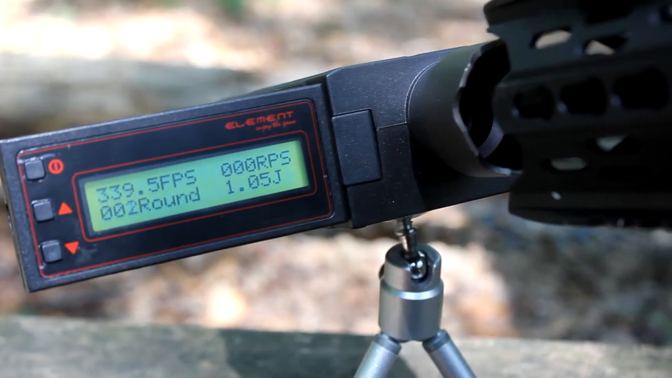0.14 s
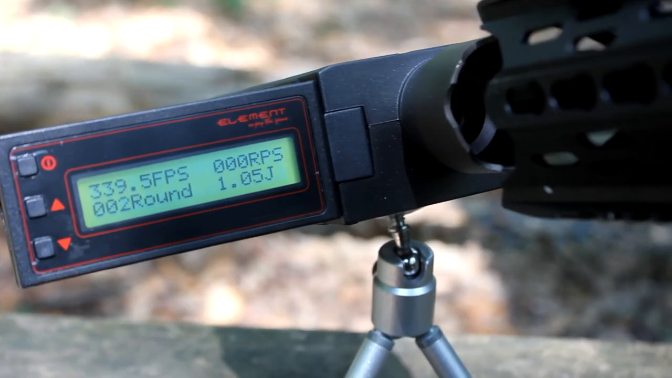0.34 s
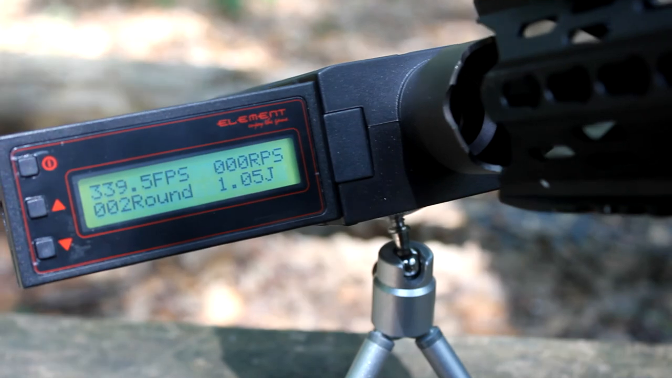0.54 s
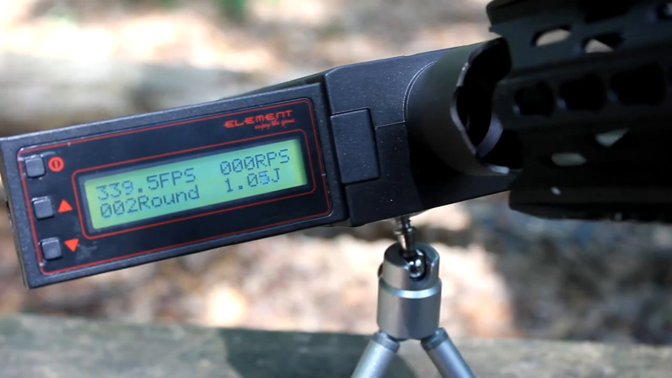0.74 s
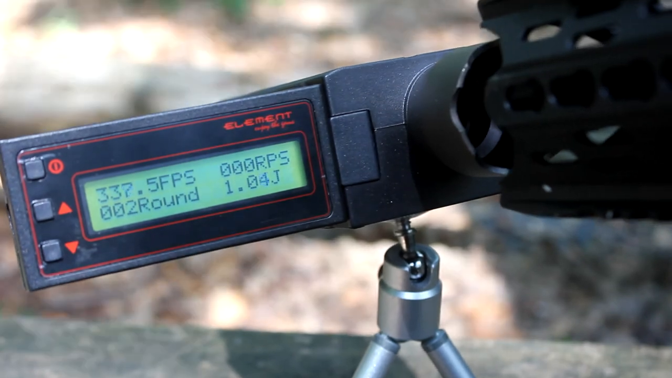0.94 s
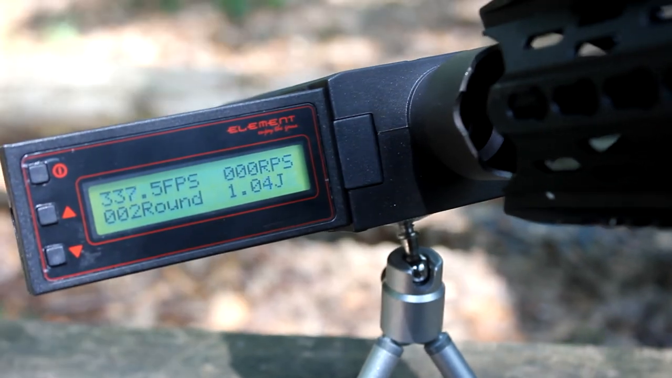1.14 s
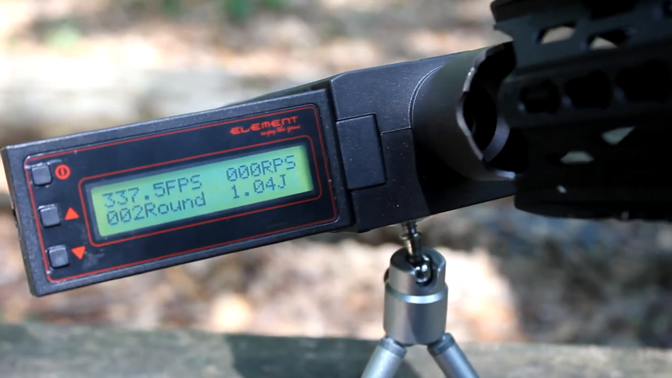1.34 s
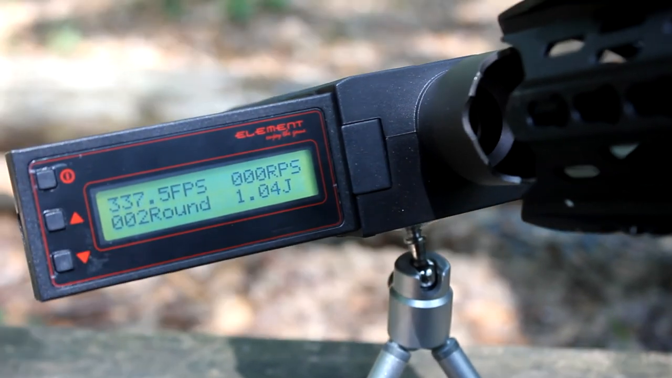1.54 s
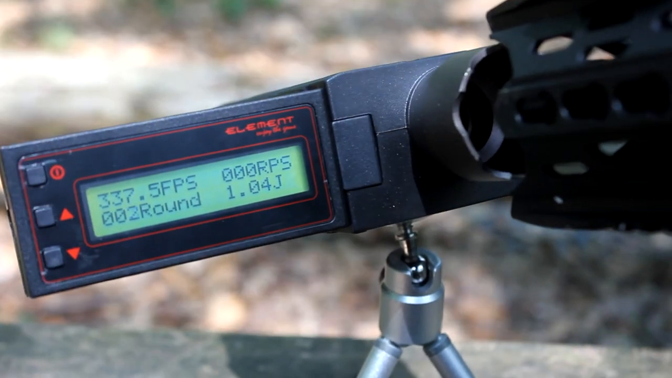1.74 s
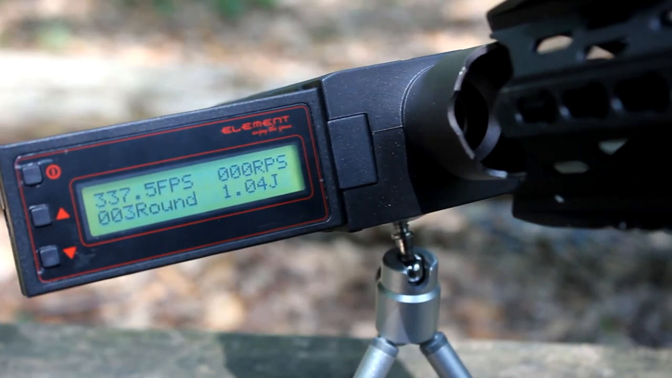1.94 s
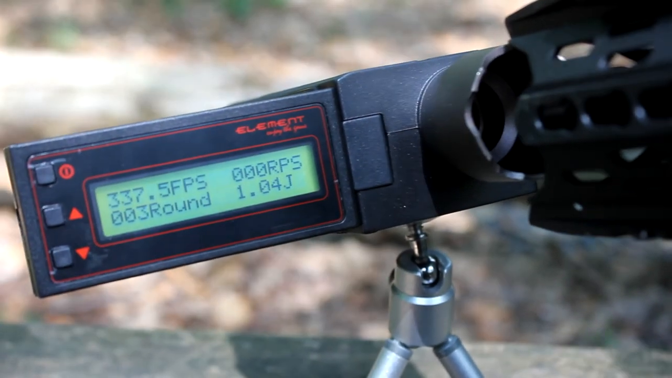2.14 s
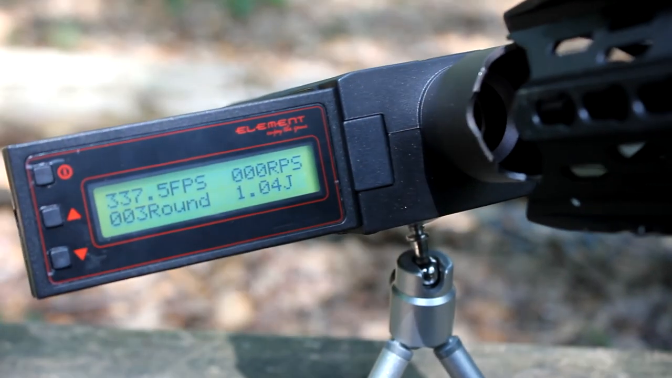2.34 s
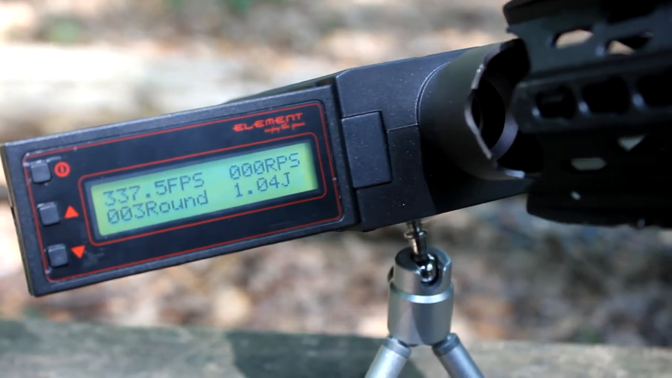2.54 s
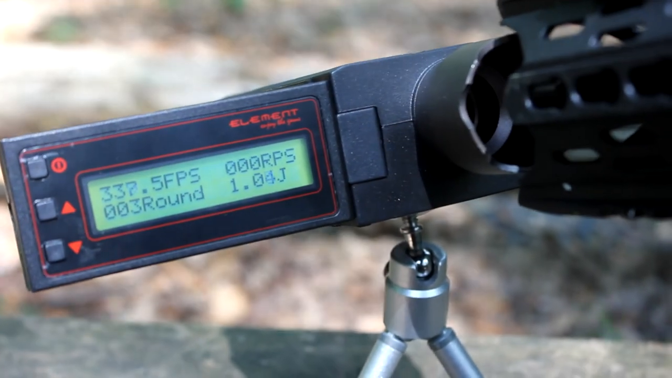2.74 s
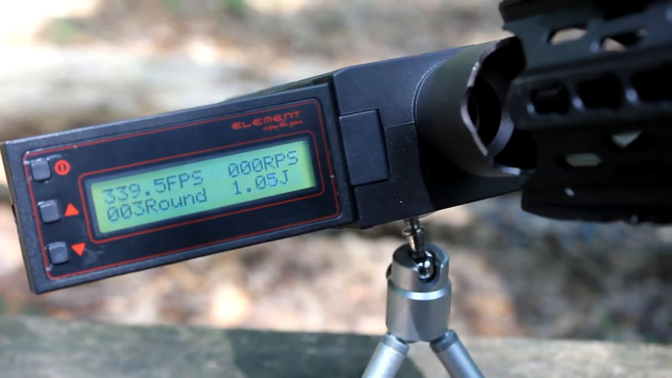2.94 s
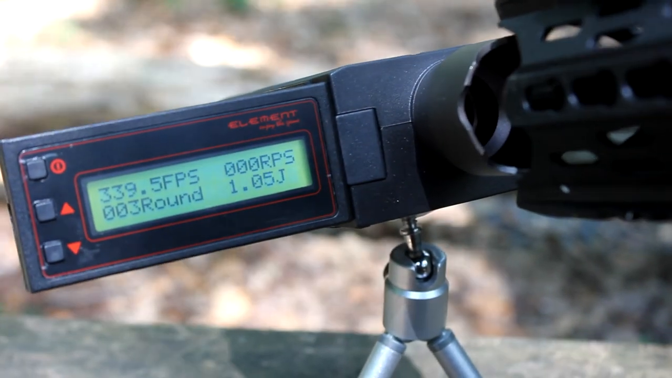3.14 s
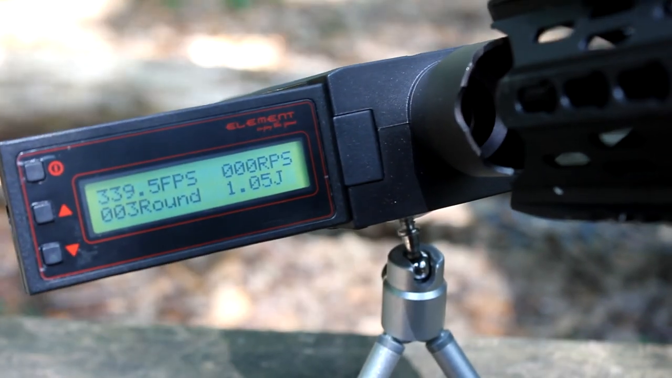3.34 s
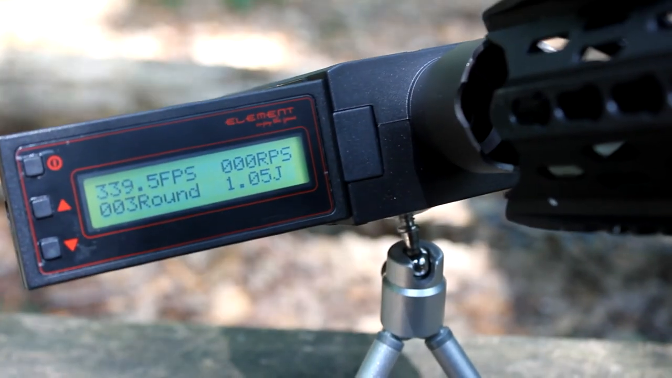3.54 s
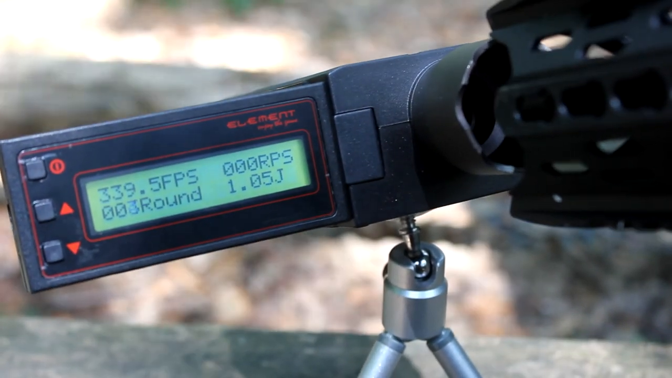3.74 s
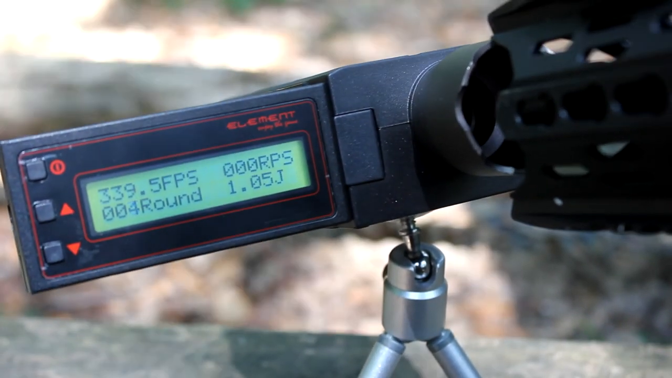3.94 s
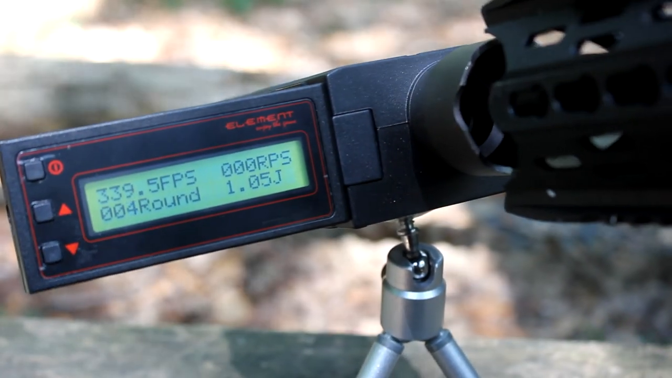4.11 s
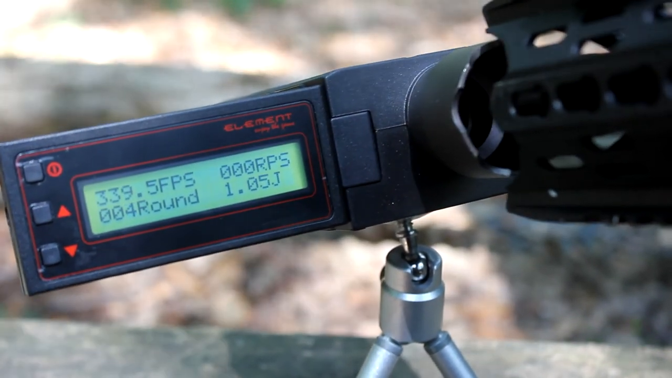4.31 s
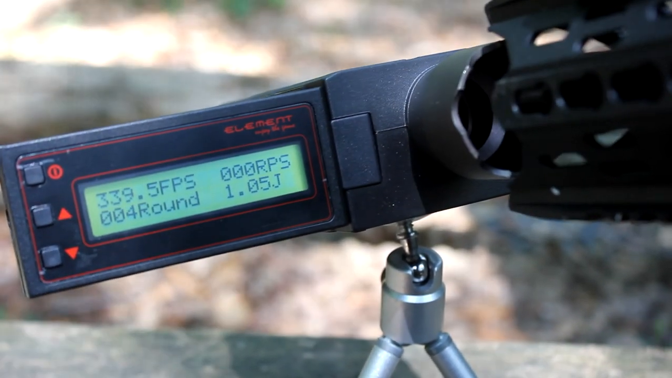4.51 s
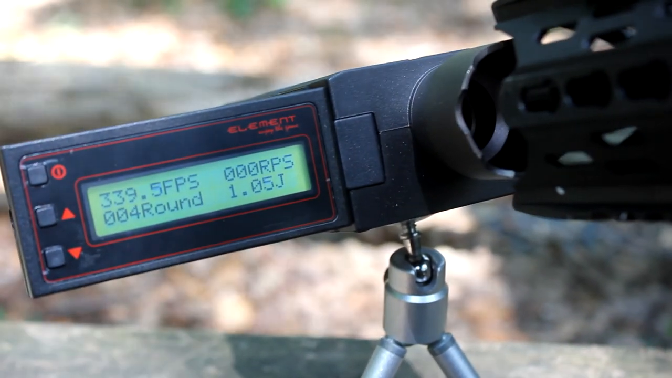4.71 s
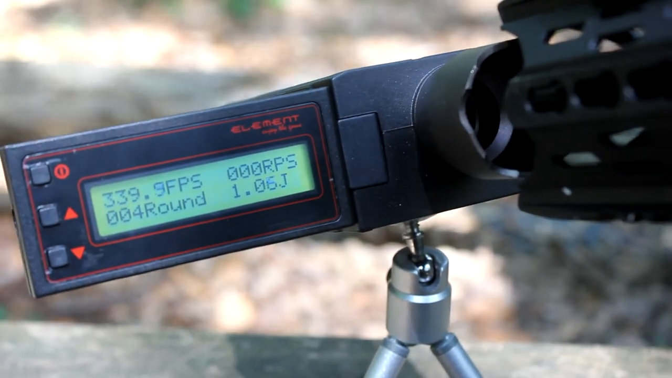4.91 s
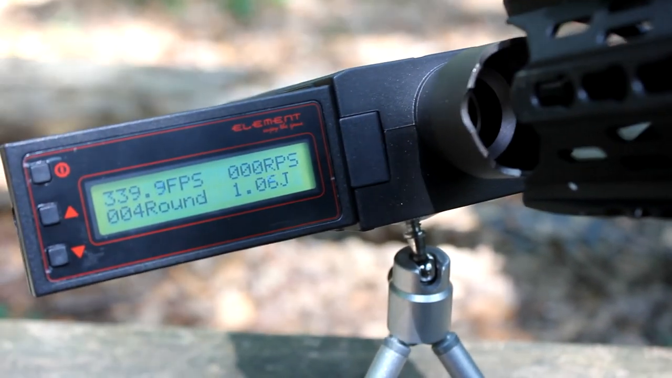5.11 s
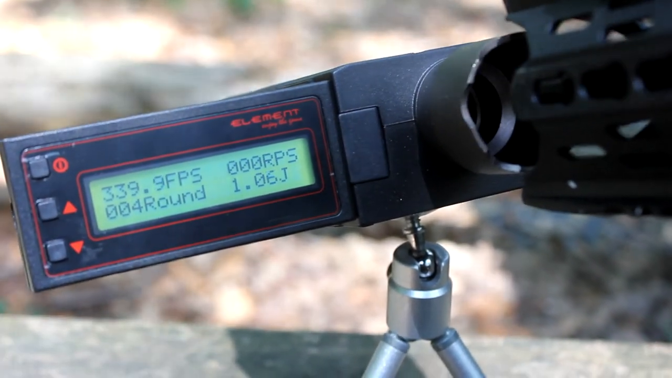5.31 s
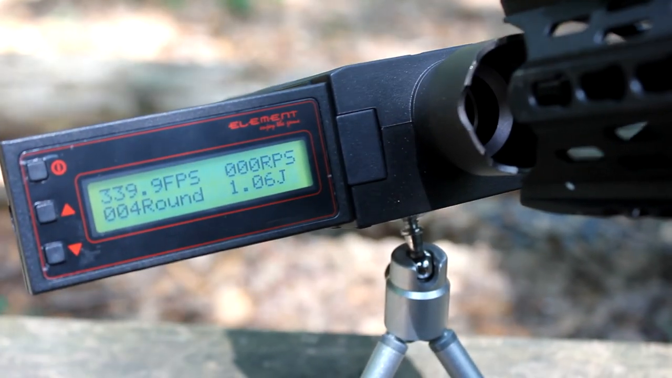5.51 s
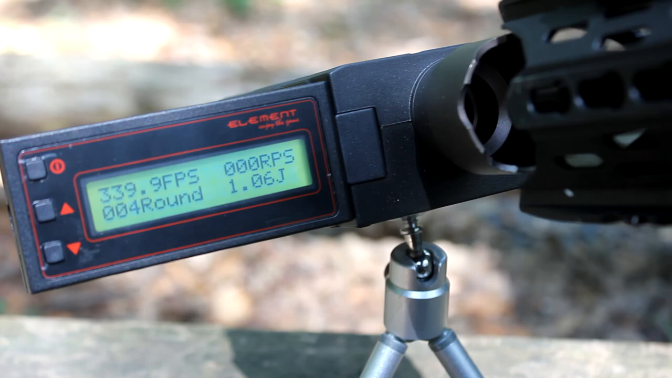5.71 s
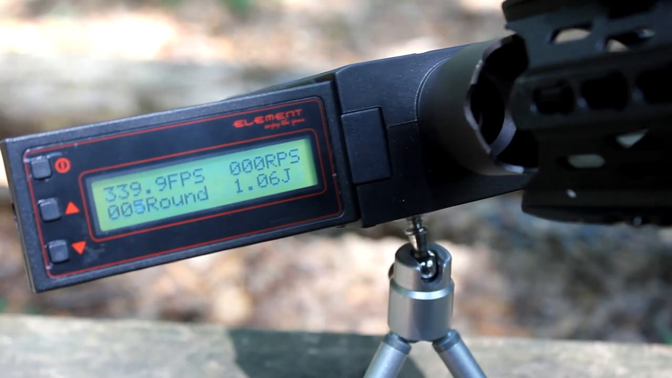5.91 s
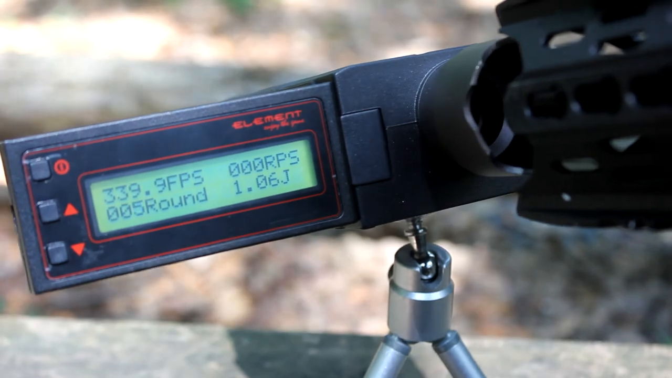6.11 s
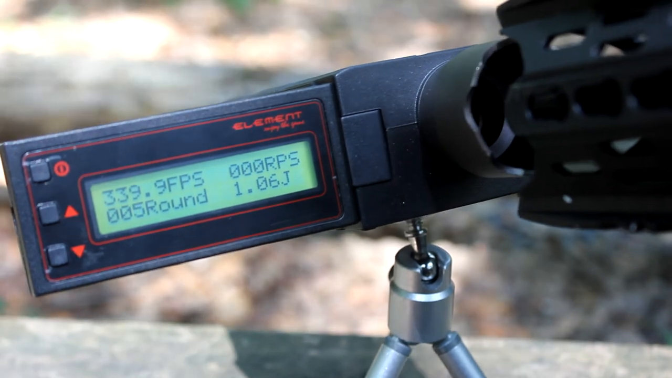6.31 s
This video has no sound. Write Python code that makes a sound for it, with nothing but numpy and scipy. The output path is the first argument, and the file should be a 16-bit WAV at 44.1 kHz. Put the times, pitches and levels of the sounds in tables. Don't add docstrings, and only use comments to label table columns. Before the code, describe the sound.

Close to a small camera microphone in a wood, an electric airsoft rifle fires four spaced single shots. Each begins with a very short rising motor and gear whine, then a sharp rattling piston clack, a tiny pellet tick and a faint gear run-down. Soft leaf hiss dips at each shot and swells back. A bird whistles early, wind thumps the microphone midway, and another bird trills before the last shot.

```python
import sys
import numpy as np
from scipy import signal
from scipy.fft import rfft, irfft
from scipy.io import wavfile
from scipy.ndimage import uniform_filter1d

SR = 44100
rng = np.random.default_rng(int(sys.argv[2]) if len(sys.argv) > 2 else 0)


def convert_level_to_amplitude(level_db):
    exponent = np.asarray(level_db, float) / 20
    return 10 ** exponent


def put_to_file(sound):
    columns = np.atleast_2d(sound).T
    safe = np.clip(columns, -1, 1)
    whole_steps = np.round(safe * 32767)
    wavfile.write(sys.argv[1], SR, whole_steps.astype(np.int16))


N = 284886
TIME_S = np.arange(N) / SR

# freq_hz, level_db_per_hz
LEAF_SPECTRUM = [(18, -21), (30, -43), (70, -2.5), (112, -7), (153, -2), (189, -5), (245, -1.5), (345, -4),
                 (415, -4), (540, -8.5), (702, -7.5), (1070, -8), (4910, -9), (12300, -24), (16000, -29)]
# time_s, level_db
LEAF_LEVEL = [(0, -45), (1.5, -46.5), (2.4, -48.5), (3.5, -49), (4.5, -50.5), (5.4, -49), (6.46, -52.5)]
# time_s, level_db
HUM_LEVEL = [(0, -54), (2.2, -47), (3.2, -52.5), (3.8, -57), (4.5, -67), (6.46, -72)]
# time_s, level_db
INSECT_LEVEL = [(0, -74), (2, -61), (2.15, -57), (4.4, -58.5), (4.8, -48), (5.3, -56), (6.46, -42)]
# time_s, level_db
GUST_LEVEL = [(0, -63), (1.1, -61), (1.45, -64), (1.9, -60), (2.25, -40), (2.45, -59), (3.5, -57),
              (3.72, -50), (4.1, -40), (4.45, -54), (4.72, -52), (4.78, -30), (4.88, -46), (5.05, -35),
              (5.2, -43.5), (5.45, -55), (5.8, -51), (6.46, -56)]
# time_s, peak_db, pitch_hz, length_cycles
PUFFS = [(1.846, -27, 110, 1.0), (2.108, -27, 107, 0.94), (2.24, -39, 72.7, 0.43), (2.339, -33.5, 87, 0.89),
         (2.969, -39, 73, 0.92), (3.68, -24.5, 91.5, 0.97), (3.799, -40.5, 72.7, 0.83),
         (3.909, -31, 83.4, 0.82), (3.946, -32, 84.4, 0.86), (3.962, -18, 110, 0.96),
         (4.007, -34, 113, 1.0), (4.049, -39, 135, 0.99), (4.108, -17.5, 110, 0.72),
         (4.17, -36, 80.7, 0.72), (4.198, -30, 81.5, 0.74), (4.239, -51, 153, 0.76), (4.77, -44, 88, 0.74),
         (4.984, -32.5, 122, 0.78), (5.046, -26, 127, 0.68), (5.071, -28, 138, 0.62),
         (5.159, -36, 71, 0.96), (5.45, -34.5, 72.7, 0.89), (5.613, -33, 69, 1.0), (5.68, -43, 72.7, 1),
         (5.91, -37, 74.4, 0.91)]
# piston_slam_s, trigger_lead_ms
SHOTS = [
    (.6074, 83),
    (2.5497, 86),
    (4.6294, 85),
    (6.3675, 85),
]
# full_mesh_hz, run_up_lag_ms, whine_db, slam_db, lurch_db
EFFORT = [(1557, 1.14, -18, -5.5, -27), (1598, -1.525, -17.5, -8, -27), (1560, 0.776, -18.5, -6.5, -39),
          (1566, 0.46, -17.5, -5.5, -37)]
# mesh_rate_multiple, level_db
TOOTH_HARMONICS = [(1, 4), (2, 2), (3, 2), (4, -2.5), (5, -11)]
# freq_hz, gain_db
GEARBOX_RESPONSE = [(200, -22), (550, -7.5), (850, 6.5), (980, 4), (1100, -10), (1400, -12), (1570, -8),
                    (1950, -2), (2500, -2.5), (2780, 1), (3100, 1.5), (3600, 9), (4400, -3.5), (4750, 1),
                    (5700, 1), (6250, -1), (8000, -11.5)]
# freq_hz, level_db_per_hz
GRIND_SPECTRUM = [(120, -77), (200, -17), (1060, -5.5), (1560, -4.5), (2330, -4.5), (3070, -3.5),
                  (3430, -3.5), (6170, -6), (8270, -21.5), (13600, -10), (16000, -19)]
# pinion_bite_db, slack_db, pellet_graze_db, pellet_hit_db, coasting_db
KNOCKS = [(-16, -35, -16, -13, -38), (-14, -33, -29, -6, -38.5), (-20, -31, -25, -12.5, -35.5),
          (-15, -19, -39, -6.5, -39.5)]
BLOW_DELAY_MS = [-12, -9, -6, -3.6, -2, 0, 4, 6]
# level_db, ring_ms
BLOWS = [(-23.5, 55), (-27.5, 17), (-7, 13), (-14.5, 45), (-5.5, 10), (-7.5, 20.6), (-7.5, 5), (-16, 4.3)]
# freq_hz, level_db_per_hz
SLAM_SPECTRUM = [(35, -51), (60, -48), (268, -11), (527, -14), (715, -6.5), (2300, -3.5), (2710, -7),
                 (3500, 0.5), (4750, -3.5), (7750, -12.5), (10800, -16), (11800, -8.5), (16000, -32)]
# centre_hz, width_hz, level_db
CYLINDER_MODES = [(110, 79, -19.5), (267, 210, -14.5), (1155, 135, -7), (3370, 120, -3), (3900, 220, -6.5),
                  (4700, 560, -6)]
# time_s, peak_db, centre_hz, ring_s
TICKS = [(.644, -39, 5300, .015), (.677, -32, 4500, 0.013), (.7265, -28, 3500, 0.032),
         (.727, -29, 1300, 0.022), (2.392, -33, 8000, .008), (2.3925, -24, 15000, .014),
         (2.403, -40, 10500, .012), (2.427, -34, 10500, .012), (2.596, -30, 3900, .012),
         (2.649, -36.5, 800, 0.024), (4.695, -42, 5400, .012), (4.724, -33, 800, 0.014),
         (2.319, -35, 10500, .012), (2.736, -42.5, 13500, .01), (2.9, -35.5, 9000, 0.0058),
         (3.33, -36, 9000, 0.012), (3.9, -38, 10000, .01), (4.27, -36, 9000, .01), (5.32, -38, 10100, .01),
         (5.512, -37, 10500, .01), (5.88, -44, 12000, .01)]
# time_s, from_hz, to_hz, length_ms, level_db
WHISTLES = [(1.08, 6560, 6670, 51, -53), (1.13, 6650, 6540, 24, -54), (1.171, 4620, 4710, 30, -47),
            (1.21, 4700, 4370, 21, -45), (1.225, 5020, 5140, 35, -50), (1.26, 4550, 4380, 66, -52),
            (1.3, 3710, 4080, 43, -44.5), (1.329, 4020, 4040, 41, -42), (1.375, 3900, 4060, 28, -56),
            (1.44, 3550, 4000, 16, -43), (1.455, 4210, 4400, 19, -42), (1.895, 5400, 5960, 37, -45),
            (1.96, 6000, 5670, 31, -49), (2.075, 4080, 4020, 11, -43), (2.1, 3060, 2940, 21, -56)]
# delay_ms, from_hz, to_hz, length_ms, level_db
SLUR = [(0, 5900, 5000, 42, 0)]
# delay_ms, from_hz, to_hz, length_ms, level_db
HELD = [(0, 4430, 4370, 18, 0)]
# delay_ms, from_hz, to_hz, length_ms, level_db
DIP = [(0, 3350, 2950, 27, 0)]
# delay_ms, from_hz, to_hz, length_ms, level_db
ANSWER = [(0, 3960, 3900, 10, 1.5), (15, 4550, 3300, 34, -1.5)]
# delay_ms, from_hz, to_hz, length_ms, level_db
RUSH = [(0, 3580, 5600, 29, -2.5), (22, 3640, 2670, 31, 0)]
# delay_ms, from_hz, to_hz, length_ms, level_db
ACCENT = [(0, 3960, 3890, 16, 0)]
# time_s, level_db, pitch_ratio
SLURS = [(4.949, -58, .98), (5.059, -56, 1.01), (5.19, -55, 1.), (5.319, -49, 1.02), (5.455, -49, .98),
         (5.6, -49, .93), (5.737, -50, .93), (5.875, -48, .92)]
# time_s, level_db, pitch_ratio
HELDS = [(4.94, -53, 1.), (5.084, -50, .995), (5.225, -53, .96), (5.4, -52, 1.02), (5.619, -44, 1.05),
         (5.748, -43.5, 1.02), (5.888, -46, 1.)]
# time_s, level_db, pitch_ratio
DIPS = [(5.639, -45, 0.99), (5.779, -49, 0.98), (5.919, -46, .93)]
# time_s, level_db, pitch_ratio
ANSWERS = [(5.529, -46.5, 1.), (5.669, -44.5, 0.95), (5.8, -45, 0.96), (5.936, -43, 0.97)]
# time_s, level_db, pitch_ratio
RUSHES = [(6.014, -43, .98), (6.09, -41.5, .99), (6.161, -41.5, 1.01), (6.231, -45, 1.1)]
# time_s, level_db, pitch_ratio
ACCENTS = [(5.359, -41, 1.), (5.5, -43, .865), (5.895, -42, .99)]


def level(x, db):
    return x * convert_level_to_amplitude(db) / np.sqrt(np.mean(x ** 2))


def band(x, hz, width_hz):
    b, a = signal.iirpeak(min(hz, .45 * SR), hz / width_hz, SR)
    return signal.lfilter(b, a, x)


def colour(x, spectrum, size=1024):
    hz, db = np.transpose(spectrum)
    grid_hz = np.linspace(1, SR / 2, size + 1)
    cepstrum = irfft(np.log(convert_level_to_amplitude(np.interp(np.log(grid_hz), np.log(hz), db))))
    cepstrum[1:size] *= 2
    cepstrum[size + 1:] = 0
    impulse = irfft(np.exp(rfft(cepstrum)))
    return signal.fftconvolve(x, impulse)[:len(x)]


def add(out, start_s, x):
    i = int(start_s * SR)
    out[i:i + len(x)] += x[:N - i]


def fade(t60_s, size=2048):
    return 1000. ** (-np.arange(size) / SR / max(t60_s, 1 / 500))


def walk(rate_hz, size=N):
    hold = int(SR / rate_hz)
    held = np.repeat(rng.standard_normal(size // hold + 1), hold)
    slewed = uniform_filter1d(uniform_filter1d(held, hold), hold)
    return 1.374 * slewed[:size]


def curve(points):
    return np.interp(TIME_S, *np.transpose(points))


def note(from_hz, to_hz, ms):
    t = np.linspace(0, 1, int(max(ms, 4) * SR / 1000))
    turns = np.cumsum(from_hz + (to_hz - from_hz) * t) / SR
    return np.sqrt(2) * np.sin(np.pi * t) * np.sin(2 * np.pi * turns)


def echo(x, t60_s, db):
    size = SR // 2
    tail = level(rng.standard_normal(size) * fade(t60_s, size), db)
    return signal.fftconvolve(x, tail)[:N]


def camera_gain_db(duck_db=-20, attack_s=.11, hold_s=.16, release_s=.24):
    db = np.zeros(N)
    for slam_s, lead_ms in SHOTS:
        dive = np.clip((TIME_S - slam_s + lead_ms / 1000) / attack_s, 0, 1)
        recovery = np.exp(-np.maximum(TIME_S - slam_s - hold_s, 0) / release_s)
        db = np.minimum(db, duck_db * dive * recovery)
    return db


def leaves():
    hiss = colour(rng.standard_normal(N), LEAF_SPECTRUM)
    hiss = hiss / np.std(band(hiss, 1280, 1610))
    return hiss * convert_level_to_amplitude(curve(LEAF_LEVEL) + .3 * walk(10))


def far_hum():
    hz = 158.6 * (1 + .00697 * walk(2.96))
    tone = np.sin(2 * np.pi * np.cumsum(hz) / SR)
    return tone * convert_level_to_amplitude(curve(HUM_LEVEL) + 1.8 * walk(25.16))


def insects(hz=3404, width_hz=590):
    chirr = band(band(rng.standard_normal(N), hz, width_hz), hz, width_hz)
    return level(chirr, 0) * convert_level_to_amplitude(curve(INSECT_LEVEL) + 2.5 * walk(30))


def wood():
    return (leaves() + far_hum() + insects()) * convert_level_to_amplitude(camera_gain_db())


def wind():
    rumble = level(band(band(rng.standard_normal(N), 70, 110), 80, 160), 0) * convert_level_to_amplitude(4 * walk(18))
    out = rumble * convert_level_to_amplitude(curve(GUST_LEVEL) - 2.5 + .98 * camera_gain_db())
    for s, db, hz, cycles in PUFFS:
        puff = note(1.62 * hz, .39 * hz, 2000 * cycles / hz)
        flutter = note(2.25 * hz, 1.87 * hz, 900 / hz)
        add(out, s - .61 * cycles / hz, convert_level_to_amplitude(db - 5.5) * puff)
        add(out, s - .3 / hz, convert_level_to_amplitude(db - 17) * flutter)
    return out


def motor(lead_ms, full_hz, lag_ms, size=4410):
    full_speed_ms, rise_ms, bend = -30, 60.5, 1.75
    ms = np.arange(size) / SR * 1000 - lead_ms
    to_go = np.clip((full_speed_ms + lag_ms - ms) / rise_ms, 0, 1)
    hz = full_hz * (1 - to_go ** bend)
    turns = np.cumsum(hz * (1 + .0035 * walk(262, size))) / SR
    teeth = sum(convert_level_to_amplitude(db + 2.5 * walk(300, size)) * np.cos(2 * np.pi * k * turns)
                for k, db in TOOTH_HARMONICS)
    scrape = 1 + .63 * np.cos(2 * np.pi * turns)
    noise = rng.standard_normal(size) * scrape * convert_level_to_amplitude(1.86 * walk(264, size))
    grind = colour(noise, GRIND_SPECTRUM)
    bite = np.clip((ms + 75) / 1.0, .2, 1)
    load = np.clip((ms + lead_ms) / 5.7, .15, 1)
    release = np.clip((-6 - ms) / 4, 0, 1)
    spin_off = np.clip((5 - ms) / 10, 0, 1)
    whine = release * level(colour(teeth, GEARBOX_RESPONSE), 0)
    return load * (whine + spin_off * bite * level(grind, -4))


def motor_run_up():
    out = np.zeros(N)
    for (slam_s, lead_ms), (full_hz, lag_ms, whine_db, _, lurch_db) in zip(SHOTS, EFFORT):
        trigger_s = slam_s - lead_ms / 1000
        add(out, trigger_s, convert_level_to_amplitude(whine_db) * motor(lead_ms, full_hz, lag_ms))
        add(out, trigger_s, convert_level_to_amplitude(lurch_db) * note(404, 630, 9.5))
        add(out, trigger_s, convert_level_to_amplitude(lurch_db - 8) * note(890, 620, 13))
    return out


def clicks(table, crack_db):
    out = np.zeros(N)
    for s, db, hz, ring_s in table:
        noise = rng.standard_normal(2048)
        strike = noise * fade(ring_s) + 1.3 * fade(0) ** 4
        crack = convert_level_to_amplitude(crack_db) * noise * fade(.5 * ring_s)
        knock = band(strike, hz, .5 * hz) + crack
        add(out, s, convert_level_to_amplitude(db) * knock / np.abs(knock).max())
    return out


def knocks():
    start, pellet, settle = [], [], []
    for (slam_s, lead_ms), (bite_db, slack_db, graze_db, hit_db, _) in zip(SHOTS, KNOCKS):
        trigger_s = slam_s - lead_ms / 1000
        start += [(trigger_s, bite_db, 550, .02), (trigger_s + .014, slack_db, 12000, .018)]
        pellet += [(slam_s + .0237, graze_db, 9000, .005), (slam_s + .0245, hit_db, 4530, .005)]
        settle += [(slam_s + .0345, -33, 1400, .012)]
    return clicks(start, -26.5) + clicks(pellet, -35) + clicks(settle, -19)


def piston_blows():
    out = np.zeros(N)
    for slam_s, _ in SHOTS:
        for delay_ms, (db, ring_ms) in zip(BLOW_DELAY_MS, BLOWS):
            burst = rng.standard_normal(2048) * fade(ring_ms / 1000)
            add(out, slam_s + delay_ms / 1000, convert_level_to_amplitude(.4 + db) * burst)
    return colour(out, SLAM_SPECTRUM) * convert_level_to_amplitude(8.5)


def piston_impact():
    out = np.zeros(N)
    for (slam_s, _), (_, _, _, slam_db, _) in zip(SHOTS, EFFORT):
        add(out, slam_s, convert_level_to_amplitude(slam_db) * np.array([1., .6, .3]))
    return out


def cylinder_ring(impact):
    return sum(convert_level_to_amplitude(db + 31.5) * band(band(impact, hz, 3 * width_hz), hz, width_hz)
               for hz, width_hz, db in CYLINDER_MODES)


def coasting_gears():
    out = np.zeros(N)
    for (slam_s, _), (*_, db) in zip(SHOTS, KNOCKS):
        coast_s = slam_s + .0432
        add(out, coast_s, convert_level_to_amplitude(db) * note(1180, 620, 17.5))
        add(out, coast_s + .019, convert_level_to_amplitude(db - 10.5) * note(860, 680, 13))
        scrape = level(colour(rng.standard_normal(1400), GRIND_SPECTRUM), db - 3)
        add(out, coast_s - .012, scrape * np.hanning(1400) ** .21)
    return out


def tree_answer(impact):
    mid = band(band(echo(impact, .8, -43), 3700, 4700), 2200, 7800)
    treble = band(echo(impact, .55, -52), 11000, 9000)
    gap = sum(np.exp(-np.abs(TIME_S - slam_s) / .039) for slam_s, _ in SHOTS)
    return (mid + treble) * convert_level_to_amplitude(camera_gain_db() + 20) * (1 - gap)


def rifle():
    impact = piston_impact()
    mechanism = motor_run_up() + knocks() + clicks(TICKS, -20)
    stroke = piston_blows() + cylinder_ring(impact)
    return mechanism + stroke + coasting_gears() + tree_answer(impact)


def song(notes, buzz_db, wobble_samples):
    out = np.zeros(N)
    for s, from_hz, to_hz, ms, db in notes:
        add(out, s, convert_level_to_amplitude(db) * note(from_hz, to_hz, ms))
    drift = np.arange(N) + wobble_samples * walk(150)
    return np.interp(drift, np.arange(N), out) * convert_level_to_amplitude(buzz_db * walk(400))


def trill():
    figures = ((SLUR, SLURS), (HELD, HELDS), (DIP, DIPS),
               (ANSWER, ANSWERS), (RUSH, RUSHES), (ACCENT, ACCENTS))
    notes = []
    for figure, sung in figures:
        for s, db, ratio in sung:
            for delay_ms, from_hz, to_hz, length_ms, note_db in figure:
                notes.append((s + delay_ms / 1000, ratio * from_hz, ratio * to_hz,
                              length_ms, db + note_db))
    return notes


def birds():
    near = convert_level_to_amplitude(-.5) * song(WHISTLES, 2., 1.6)
    far = convert_level_to_amplitude(-1.5) * song(trill(), 3.5, 1.5)
    near_echo = echo(near, .3, -46) + echo(near, 1.0, -42)
    far_echo = echo(far, .53, -38) + echo(far, 4.4, -37) * (1 + .6 * walk(500))
    last_slam_s = SHOTS[-1][0]
    duck_db = -14 * np.clip((TIME_S - last_slam_s + .08) / .05, 0, 1)
    return convert_level_to_amplitude(duck_db) * (near + near_echo + far + far_echo)


def scene():
    return (wood() + wind() + rifle() + birds())[None]


def band_limit(x):
    return signal.sosfilt(signal.butter(12, 16490, fs=SR, output="sos"), x)


def record(dry):
    ceiling, top_hz = .72, 15850
    limited = ceiling * np.tanh(1.026 * dry / ceiling)
    lowpass = signal.ellip(8, .2, 60, top_hz, fs=SR, output="sos")
    mix = signal.sosfilt(lowpass, limited)
    return band_limit(mix)


dry = scene()
out = record(dry)
put_to_file(out)
```